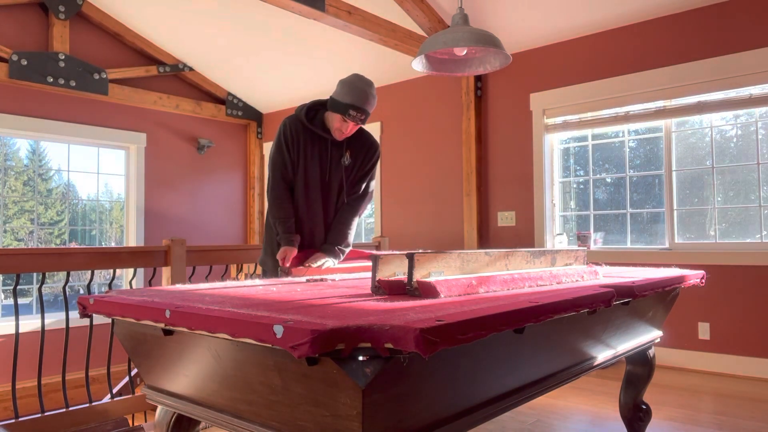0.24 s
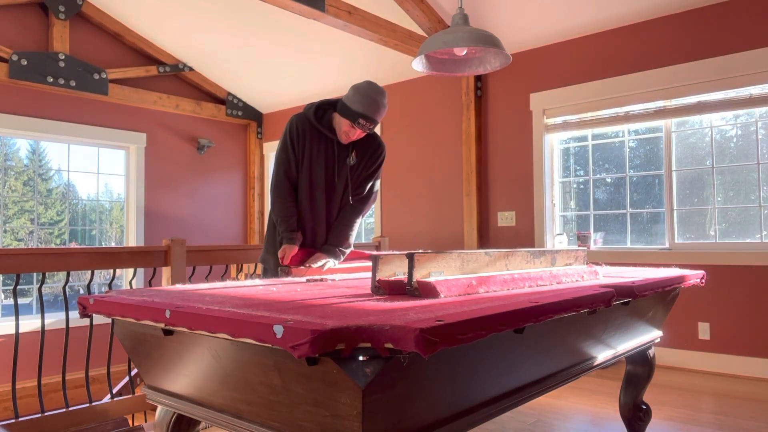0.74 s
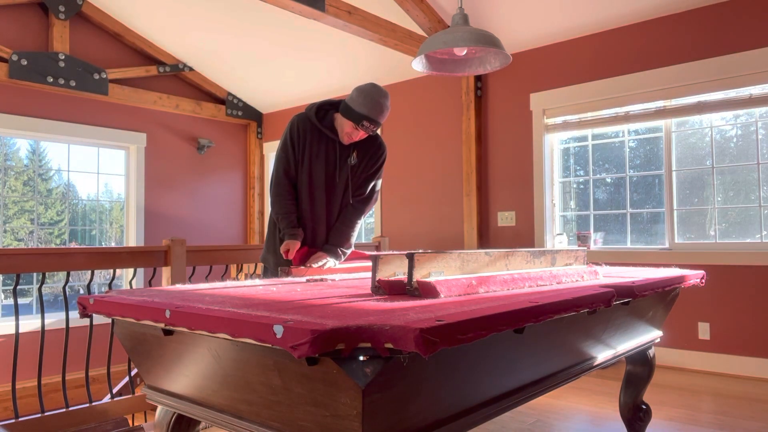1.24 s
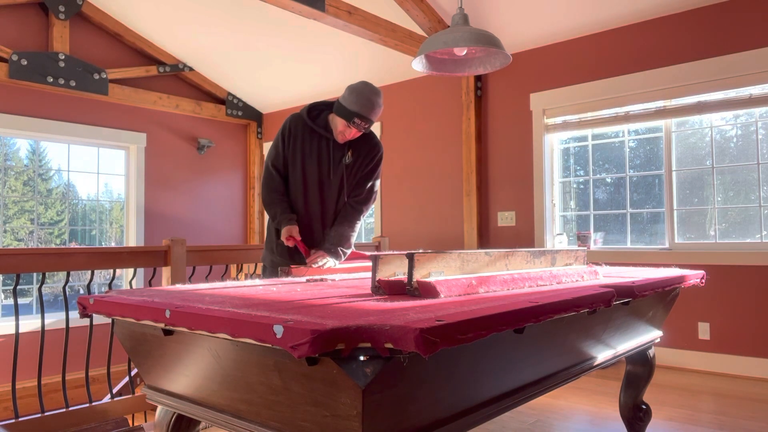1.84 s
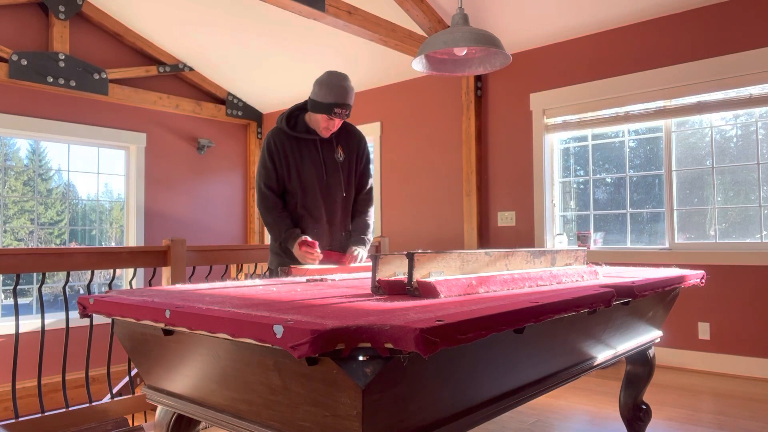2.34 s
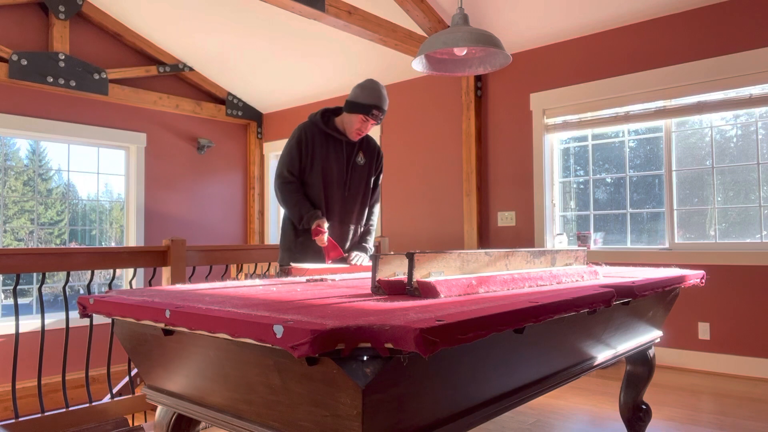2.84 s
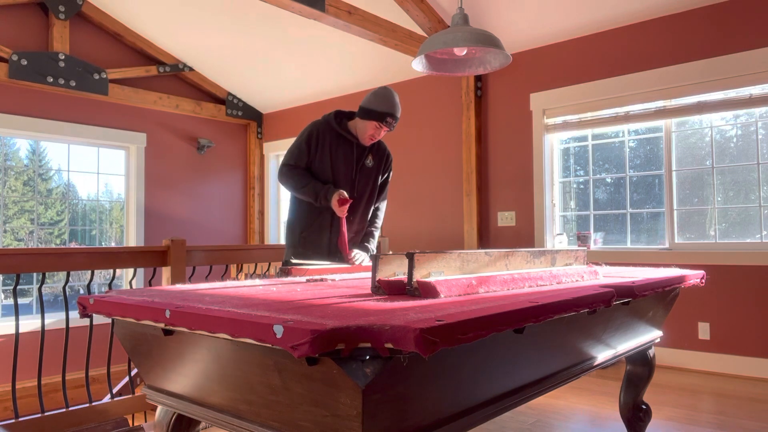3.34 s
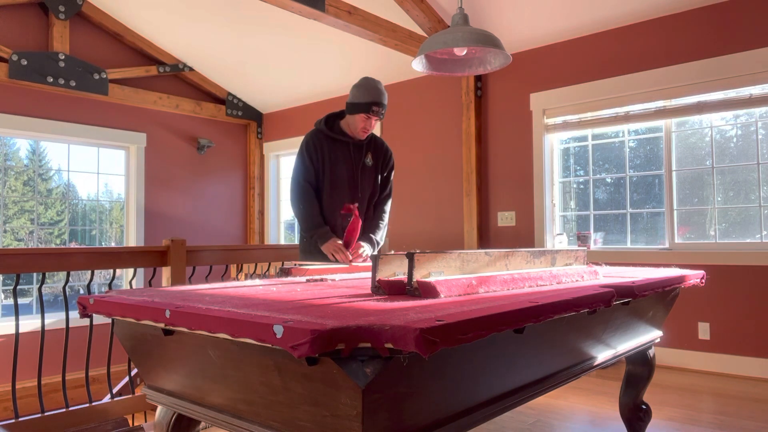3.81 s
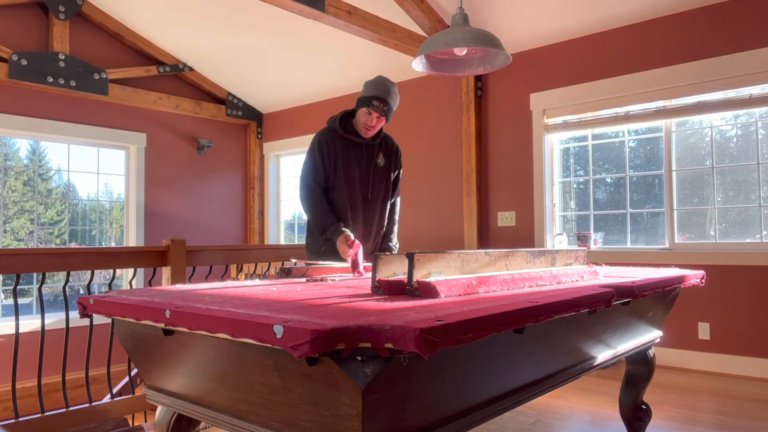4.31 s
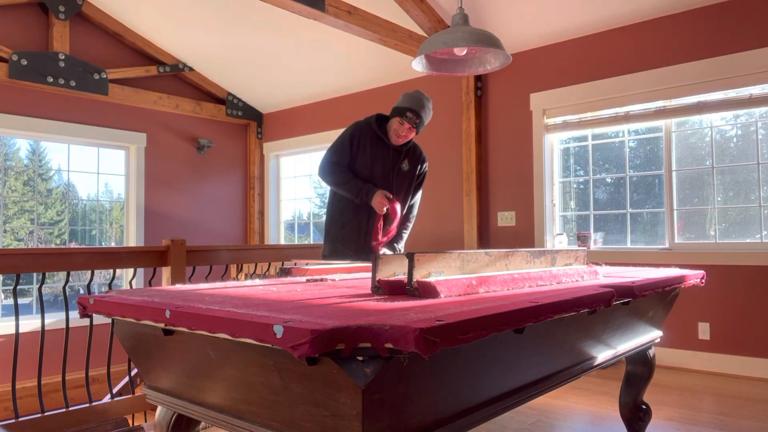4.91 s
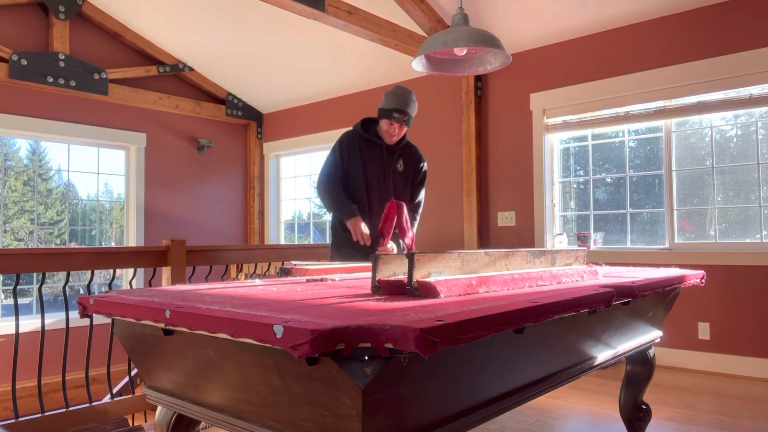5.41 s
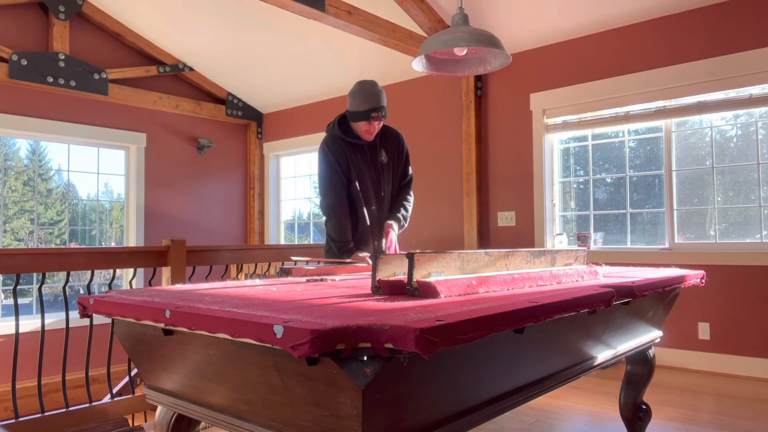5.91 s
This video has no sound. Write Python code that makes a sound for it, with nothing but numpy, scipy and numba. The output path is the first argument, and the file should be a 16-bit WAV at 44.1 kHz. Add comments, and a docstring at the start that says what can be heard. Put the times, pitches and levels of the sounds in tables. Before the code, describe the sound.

In a bare, reverberant wooden room, a few metres from a stereo microphone, hands shuffle and cloth rubs faintly. A wooden rail clatters, then cloth creaks and tears with a crackling rasp that ends in a quick buzz. Loose cloth swishes, a second tear speeds into a buzzing rip, more rustling follows, and a short third tear ends with a heavy wooden knock. A low rumble wavers underneath.

```python
"""Tearing cloth off a pool table rail

A bare, echoing room, heard in stereo a few metres from the microphone, over a low, wavering rumble.
Threads snap in quick runs, ring the taut strip and drum on the wooden rail; two of the three tears
run into fast, buzzing rips, made of pulse trains at the rate of the breaking threads.
Around the tears, filtered grains make loose cloth slide through the hands, scuff and creak;
struck modes make the rail knock on its table."""
import sys
import numpy as np
from scipy import signal
from scipy.fft import rfft, irfft
from scipy.io import wavfile
from numba import njit

SR = 44100
rng = np.random.default_rng(int(sys.argv[2]) if len(sys.argv) > 2 else 0)


def pcm_store(signal):
    """Save signal as 16-bit PCM."""
    levels = np.round(np.clip(np.atleast_2d(signal), -1, 1) * 32767)
    wavfile.write(sys.argv[1], SR, levels.astype(np.int16).T)


N = 271656
T = np.arange(N) / SR


def undb(db):
    """Decibels to gain."""
    return 10 ** (np.asarray(db) / 20)


def unit(x):
    """Scale to rms 1."""
    return x / np.sqrt(np.mean(x ** 2))


def at(hz, points):
    """Read (Hz, value) points on a log-frequency axis."""
    f, value = np.transpose(points)
    return np.interp(np.log(hz + 1), np.log(f), value)


def colour(x, points):
    """Causal filter with the given spectrum shape and unit power gain."""
    size = 4096
    hz = np.arange(size // 2 + 1) * SR / size
    # folding the cepstrum gives minimum phase: no sound before its cause
    cepstrum = irfft(np.log(undb(at(hz, points))))
    cepstrum[1:size // 2] *= 2
    cepstrum[size // 2 + 1:] = 0
    response = irfft(np.exp(rfft(cepstrum)))
    return signal.fftconvolve(x, response / np.linalg.norm(response))[:len(x)]


def walk(rate):
    """Smooth chance with a spread near 1, from `rate` random points a second."""
    return 1.2 * np.interp(T * rate, np.arange(4096), rng.standard_normal(4096))


def snaps(rate, spread_db):
    """Random clicks of unequal size, `rate` a second on average, rms 1."""
    happens = rng.random(N) < rate / SR
    sign = rng.choice([-1, 1], N)
    size = undb(spread_db * rng.standard_normal(N))
    return unit(happens * sign * size)


def pulse_train(hz):
    """One click for each completed cycle of a moving rate."""
    return np.diff(np.floor(np.cumsum(hz) / SR), prepend=0)


def burst(start, length):
    """A sudden start that dies away exponentially, to 1/e after `length` seconds."""
    return (T >= start) * np.exp(-np.clip((T - start) / length, 0, 20))


def gate(start, end, edge):
    """On between two times, with soft edges."""
    return np.clip(np.minimum(T - start, end - T) / edge + .5, 0, 1)


def stroke(start, end):
    """Speed of a hand, 0-1: it gathers pace, then comes to rest."""
    u = np.clip((T - start) / (end - start), 0, 1)
    return 4 * u * (1 - u)


def resonate(x, modes):
    """Pass a sound twice through each resonance for steep skirts, rms 1."""
    out = 0
    for hz, half_width_hz, db in modes:
        b, a = signal.iirpeak(hz, hz / half_width_hz / 2, fs=SR)
        once = signal.lfilter(b, a, x)
        out = out + undb(db) * signal.lfilter(b, a, once)
    return unit(out)


def glide(x, hz, width_hz):
    """Pass a sound through one moving resonance, rms 1."""
    turn = np.exp(2j * np.pi * np.cumsum(hz) / SR)
    # shift the resonance down to 0 Hz, low-pass there, shift back
    narrow = signal.lfilter(*signal.butter(2, width_hz / 2, fs=SR), x / turn)
    return unit((narrow * turn).real)


# difference between the two sides of the field: freq_hz, side_minus_mid_db
FIELD_SIDE = [(50, -19.5), (120, -9.5), (250, -4.5), (600, 2), (15000, -5)]


def widen(mid, side):
    """Left and right of a field: nearly alike in the bass, least near 600 Hz, somewhat more above."""
    gain = undb(at(np.linspace(0, SR / 2, len(side) // 2 + 1), FIELD_SIDE))
    side = irfft(rfft(side) * gain, len(side))
    return np.array([mid + side, mid - side])


# colour of the rumble: freq_hz, relative level_db
RUMBLE_COLOUR = [(14, -53), (29, -32), (41, 8), (50, -6.5), (64, 5.5), (92, -14), (130, -14), (200, -13.5),
                 (290, -18), (520, -33), (790, -36), (1100, -43.5), (2100, -50.5), (5000, -56.5),
                 (11000, -59.5), (15000, -60)]


def ambience(level_db=-50):
    """A low, slowly wavering rumble fills the house: coloured noise on both channels."""
    mid = unit(colour(rng.standard_normal(N), RUMBLE_COLOUR))
    side = unit(colour(rng.standard_normal(N), RUMBLE_COLOUR))
    waver_db = 1.2 * walk(6)
    return widen(mid, side) * undb(level_db + waver_db)


# how long the room rings: freq_hz, t60_s
ROOM_T60 = [(60, 0.65), (200, 0.48), (500, 0.6), (1000, 0.72), (4000, 0.65), (8000, 0.52), (16000, 0.3)]
# strength of the echoes: freq_hz, relative level_db
ROOM_WET = [(100, 1), (300, -6.5), (700, -1.5), (5000, -4), (8000, -1.5), (14000, -2.5)]


def echoes(early_db=3, early_s=0.0054):
    """Bare walls and a wooden floor: strong early echoes, then a tail that dulls."""
    t, hz = T[:SR], np.arange(SR // 2 + 1)
    field = rfft(widen(*rng.standard_normal((2, SR))))
    octave = np.round(np.log2(np.maximum(hz, 2 ** 6)))
    tail = 0
    for b in np.unique(octave):
        in_band = octave == b
        part = irfft(field * in_band) * np.exp(-np.log(1000) * t / at(2 ** b, ROOM_T60))
        # nothing returns in the first 2 ms; the earliest echoes are boosted
        part = part * (t > .002) * (1 + undb(early_db) * np.exp(-t / early_s))
        part = part / np.linalg.norm(part.mean(axis=0))
        tail = tail + part * np.sqrt(np.mean(in_band)) * undb(at(2 ** b, ROOM_WET))
    return tail


def room(x, direct_db=-5, turns_per_s=1.1):
    """Four echo patterns fade round in turn; the direct sound reaches the left microphone first."""
    turn = 2 * np.pi * turns_per_s * T
    wet = 0
    for k in range(4):
        share = np.maximum(np.cos(turn - k * np.pi / 2), 0)
        wet = wet + signal.oaconvolve((x * share)[None], echoes(), axes=1)[:, :N]
    right = np.concatenate([np.zeros(4), x])[:N]  # 4 samples late
    return wet + undb(direct_db) * np.array([x, right])


# light metallic squeaks: start_s, level_db, fade_s (to 1/e)
SQUEAKS = [(2.1, -77.5, 0.18), (2.342, -55.5, 0.039), (2.4, -64.5, 0.079)]
# resonances of the metal: freq_hz, half_width_hz (of each pass), relative level_db
METAL = [(800, 860, -5), (1750, 300, -5.5), (2900, 1600, -9), (4200, 600, -6), (4680, 150, 3),
         (8500, 6000, -19)]


def squeaks():
    """Metal, likely a staple, squeaks thinly: uneven slips excite its resonances."""
    slips = snaps(rate=2000, spread_db=3) * undb(3 * walk(60))
    level = sum(undb(db) * burst(s, fade_s) for s, db, fade_s in SQUEAKS)
    return resonate(slips, METAL) * level


# the cloth starts to drag: start_s, end_s, first_centre_hz, last_centre_hz, level_db
DRAG = (.33, .52, 3600, 3750, -80)


def drag(width_hz=700):
    """The weave zips faintly over the edge of the wood, its narrow band rising a little in pitch."""
    start, end, first_hz, last_hz, db = DRAG
    weave = snaps(rate=1200, spread_db=3) * undb(3 * walk(25))
    centre_hz = np.interp(T, [start, end], [first_hz, last_hz])
    return glide(weave, centre_hz, width_hz) * undb(db) * gate(start, end, edge=0.033)


# coarse fibres scuff the wood: start_s, end_s, peak level_db
SCUFFS = [(0.424, 0.905, -75), (1.042, 1.084, -71), (2.583, 2.668, -53.5), (3.533, 3.685, -54),
          (3.74, 3.823, -58), (4.24, 4.306, -65.5), (5.205, 5.297, -55.5), (5.322, 5.426, -62.5),
          (5.69, 5.86, -65)]
# colour of a scuff: freq_hz, relative level_db (per Hz)
SCUFF_COLOUR = [(300, -4), (900, 8), (1700, 6), (2800, 10.5), (4000, 4.5), (8000, -26), (14000, -53)]


def scuffs():
    """Coarse fibres catch in uneven bunches as the cloth drags."""
    grain = snaps(rate=500, spread_db=4) * undb(3 * walk(55))
    level = sum(undb(db) * np.sqrt(stroke(start, end)) for start, end, db in SCUFFS)
    return unit(colour(grain, SCUFF_COLOUR)) * level


# strokes of loose cloth: start_s, end_s, rub_db, hiss_db (both before the trims below)
SLIDES = [(-.06, 0.023, -62.5, -61), (0.306, 0.944, -72.5, -100), (1.017, 1.073, -74, -73),
          (1.514, 1.66, -62.5, -67), (1.896, 2.274, -71.5, -75), (3.503, 3.864, -56.5, -49.5),
          (3.905, 4.117, -57, -66), (4.288, 4.503, -56.5, -63.5), (5.164, 5.455, -55, -56)]
# hands shift the rail: start_s, end_s, level_db (before the trim below)
SHUFFLES = [(-.05, 0.06, -45), (0.39, 0.954, -52.5), (1.025, 1.15, -43), (1.25, 1.42, -45.5),
            (1.526, 1.64, -41)]
# colours of the rub, the bright hiss and the hands: freq_hz, relative level_db (per Hz)
RUB_COLOUR = [(100, -2.5), (300, 15.5), (500, 7), (1000, 3.5), (1800, 4.5), (2700, 1.5), (4000, 1.5),
              (6500, -8.5), (10000, -44), (15000, 9.5)]
HISS_COLOUR = [(2000, -20), (5000, 2.5), (7500, -1.5), (10000, -1), (12000, -10), (15500, 10.5)]
HANDS_COLOUR = [(70, -7), (140, 1), (260, 14), (500, -3), (900, -4), (1700, -19.5), (4000, -53),
                (10000, -36)]


def handling(rub_db=6.5, hiss_db=7.5, shuffle_db=-10.5, rub_power=0.12, hiss_power=1.85):
    """Loose cloth rubs with a soft grain and hisses at speed; hands shuffle along the rail."""
    # rub and hiss each grow as a power of the hand's speed
    rubbing, hissing = 0, 0
    for start, end, stroke_rub_db, stroke_hiss_db in SLIDES:
        speed = stroke(start, end)
        ease_in = gate(start, np.inf, edge=0.069) ** 2
        rubbing = rubbing + undb(stroke_rub_db) * speed ** rub_power * ease_in
        hissing = hissing + undb(stroke_hiss_db) * speed ** hiss_power
    shifting = sum(undb(db) * np.sqrt(stroke(start, end)) for start, end, db in SHUFFLES)
    catching = undb(2 * walk(45))
    weave = snaps(rate=3000, spread_db=3)
    rub = colour(weave * catching, RUB_COLOUR) * rubbing * undb(rub_db)
    nap = snaps(rate=9000, spread_db=3)
    hiss = colour(nap * catching, HISS_COLOUR) * hissing * undb(hiss_db)
    palms = snaps(rate=2800, spread_db=3)
    shuffle = colour(palms, HANDS_COLOUR) * shifting * undb(shuffle_db)
    return rub + hiss + shuffle


# cloth creaks as it is drawn tight: start_s, length_s (to 1/e), level_db, first_slip_hz, last_slip_hz,
# fall_s (to 1/e), brightness_hz (low-pass)
CREAKS = [(2.464, 0.057, -38, 1110, 397.7, .007, 2800), (4.427, 0.054, -36.5, 473, 307.5, 0.0153, 426)]
# colour of a creak: freq_hz, relative level_db
CREAK_COLOUR = [(120, 6), (300, 4), (480, -2.5), (850, -5), (1300, -16), (1700, -25), (2300, -30),
                (5000, -27)]


def creaks(rough=.09, fibre_db=-9):
    """Cloth sticks and slips on the wood, fast at first and slowing as it tightens."""
    out, wobble = 0, walk(400)
    fibres = colour(snaps(rate=2600, spread_db=4.5), CREAK_COLOUR)
    for s, length, db, first_hz, last_hz, fall_s, bright_hz in CREAKS:
        hz = (last_hz + (first_hz - last_hz) * burst(s, fall_s)) * (1 + rough * wobble)
        slips = pulse_train(hz) - hz / SR  # centred on zero
        voice = unit(colour(slips, CREAK_COLOUR)) + undb(fibre_db) * fibres
        voice = signal.lfilter(*signal.butter(2, bright_hz, fs=SR), voice)
        swell = np.clip((T - s) / .002, 0, 1) * np.exp(-((T - s) / length) ** 2)
        out = out + undb(db) * voice * swell
    return out


# the cloth-covered bed thuds under the heavy blows: start_s, level_db, fade_s (to 1/e)
THUDS = [(1.61, -35, 0.03), (1.634, -36, 0.11), (3.225, -44, 0.07), (6.068, -27, 0.03)]
# colour of a thud: freq_hz, relative level_db (per Hz)
THUD_COLOUR = [(40, -4), (100, 13), (150, 8), (220, 10), (330, -12.5), (600, -6.5), (900, -22.5),
               (1500, -27), (4000, -71)]


def thuds():
    """The cloth-covered bed answers with a broad, dull thud: dark noise that dies away."""
    body = unit(colour(rng.standard_normal(N), THUD_COLOUR))
    return body * sum(undb(db) * burst(s, fade_s) for s, db, fade_s in THUDS)


def ring(modes):
    """One second of the sound of struck modes, neighbours in opposite phase."""
    t, out = T[:SR], 0
    for k, (hz, db, t60) in enumerate(modes):
        decay = np.exp(-np.log(1000) * t / t60)
        out = out + (-1) ** k * undb(db) * np.sin(2 * np.pi * hz * t) * decay
    return out


def add(out, start, sound):
    """Mix a sound in at a time."""
    i = int(start * SR)
    out[i:i + len(sound)] += sound[:N - i]


# rail knocks: start_s, ring_db, lowest_hz (high-pass), brightness_hz (low-pass), crack_db, boom_db
# (ring and crack before the trims below)
KNOCKS = [(1.6, -18, 302, 2020, -9.5, -73), (1.606, -8, 770, 3000, -6.5, -50),
          (1.613, -16.5, 109, 2000, -13, -46), (1.628, -12.5, 607, 1200, -10, -37),
          (1.64, -22.5, 80.6, 1200, -15, -40), (1.668, -31, 90.5, 1800, -18.5, -37),
          (1.651, -31.5, 78.6, 1500, -19, -44), (3.226, -22.5, 78, 100, -55, -66),
          (3.312, -23, 70, 91, -56.5, -61), (4.941, -16.5, 59, 95, -46, -59),
          (6.055, -23, 296, 3000, -6.5, -86), (6.067, 2, 206, 340, -9, -33.5),
          (6.081, 0.5, 225, 430, -10.5, -49), (6.099, -11, 141, 447, -3, -43),
          (6.124, -11, 140, 500, -12, -58), (6.143, -14, 140, 400, -12, -46)]
# modes of the rail on its table, then of the heavy table: freq_hz, relative level_db, t60_s
RAIL_MODES = [(122, -1, 0.55), (155, -1.5, 0.14), (186, -1, 0.28), (231, 1, 0.16), (254, -1, 0.09),
              (340, -1.5, 0.1), (445, -3, 0.03), (556, -9, 0.054), (600, -7, 0.08), (788, -13, 0.17),
              (834, -18, 0.14), (1325, -13.5, 0.09), (1510, -13.5, 0.07), (2520, -19, 0.045),
              (2810, -18, 0.03)]
TABLE_MODES = [(42.2, 6.5, 0.56), (58, -19, 0.13), (64.35, 0, 0.46), (128, -18.5, 0.93)]
# colour of the contact: freq_hz, relative level_db
CRACK_COLOUR = [(100, -14), (350, -25), (700, 4), (1400, 4), (2000, -1), (2800, 1), (4500, -1), (7000, -7),
                (10000, -13), (12500, -23.5), (15500, 2.5)]


def knocks(ring_trim_db=-11, crack_trim_db=-14.5):
    """The rail lands and rattles: wood rings, the contact cracks, the heavy table booms."""
    out, wood, table = np.zeros(N), ring(RAIL_MODES) * undb(ring_trim_db), ring(TABLE_MODES)
    crack = colour(rng.standard_normal(N), CRACK_COLOUR)
    for s, ring_db, low_hz, bright_hz, crack_db, boom_db in KNOCKS:
        # a softer contact leaves the high modes still, one near the end the low modes
        struck = signal.lfilter(*signal.butter(1, bright_hz, fs=SR), wood)
        struck = signal.lfilter(*signal.butter(2, low_hz, "high", fs=SR), struck)
        add(out, s, undb(ring_db) * struck + undb(boom_db) * table)
        out += undb(crack_db + crack_trim_db) * crack * burst(s, length=0.0035)
    return out


# bunches of strong threads give way: start_s, level_db, fade_s (to 1/e)
BUNCHES = [(2.74, -51, .018), (3.06, -49, .018), (3.135, -49, .02), (4.717, -46.5, .014),
           (4.744, -41.5, .02), (4.78, -48, .016), (4.808, -43, .018), (4.868, -46, .02), (5.685, -56, .03),
           (5.775, -50, .025)]
# resonances of the burst: freq_hz, half_width_hz (of each pass), relative level_db
BUNCH_MODES = [(3650, 260, 4), (4670, 600, 0), (5900, 970, -15)]


def bunches():
    """Now and then strong threads break in a cluster: a coarse burst through high resonances."""
    grain = snaps(rate=900, spread_db=4)
    level = sum(undb(db) * burst(s, fade_s) for s, db, fade_s in BUNCHES)
    return resonate(grain, BUNCH_MODES) * level


# fast rips: start_s, end_s, first_thread_hz, last_thread_hz, buzz_db, rasp_db, unevenness (0-1)
RIPS = [(3.15, 3.205, 385, 330, -31, -42, .06), (4.47, 4.56, 260, 245, -43.5, -60, .12),
        (4.65, 4.72, 250, 250, -45, -60, .12), (4.72, 4.78, 290, 260, -39, -58, .12),
        (4.77, 4.87, 255, 245, -32, -50, .06), (4.808, 4.88, 310, 325, -44, -38.5, .2),
        (4.88, 4.935, 335, 350, -33, -41, .06)]
# colours of the rasp and the buzz: freq_hz, relative level_db
RASP_COLOUR = [(120, -5), (300, 2), (600, 2), (950, -3.5), (1500, -14), (2200, -17), (4000, -42),
               (9000, -24.5)]
BUZZ_COLOUR = [(100, -13), (230, 9.5), (380, 0.5), (600, -36.5), (1200, -25.5), (3000, -33.5)]


def rips():
    """At speed the tear crosses the weave thread by thread, fast enough to have a pitch."""
    out, wobble = 0, walk(150)
    rasp = colour(snaps(rate=700, spread_db=3), RASP_COLOUR)
    for start, end, first_hz, last_hz, buzz_db, rasp_db, uneven in RIPS:
        hz = np.interp(T, [start, end], [first_hz, last_hz]) * (1 + uneven * wobble)
        pulses = pulse_train(hz)
        buzz = unit(colour(pulses - pulses.mean(), BUZZ_COLOUR))
        rip = undb(buzz_db) * buzz + undb(rasp_db) * rasp
        out = out + gate(start, end, edge=.016) * rip
    return out


# tears: start_s, end_s, pull_db (steady, before the thread trim), gives_s (the cloth gives), surge_db,
# surge_half_width_s (to 1/e), drum_db (rail drumming relative to the pull)
TEARS = [(2.506, 3.203, -57, 3.18, 11, 0.056, 9.5), (4.373, 4.895, -60, 4.86, 14, 0.18, 10.5),
         (5.64, 6.097, -58, 5.8, 6.5, 0.064, 6.5)]


def pulls(attack_s=0.11, release_s=0.02, drum_lag_s=0.042, drum_surge_share=0.56):
    """A pull builds slowly, surges as the cloth gives, lets go fast; the rail lags and surges less."""
    threads, rail = 0, 0
    for start, end, db, gives, surge_db, width, drum_db in TEARS:
        surge = surge_db * np.exp(-((T - gives) / width) ** 2)
        grip = gate(start, np.inf, edge=attack_s) ** 2
        held = grip * gate(-np.inf, end, edge=release_s) * undb(db)
        threads = threads + held * undb(surge)
        rail = rail + held * undb(drum_db + drum_surge_share * surge)
    return threads, np.interp(T - drum_lag_s, T, rail)


@njit
def taut_strip(x, lag, reflect):
    """Each snap runs up the strip to the hand and back, again and again."""
    y = x.copy()
    for i in range(200, len(x)):
        k = int(lag[i])
        part = lag[i] - k
        y[i] += reflect[i] * ((1 - part) * y[i - k] + part * y[i - k - 1])
    return y


# stretches in which one overtone of the strip whistles: start_s, end_s, overtone_number, level_db
WHISTLES = [(2.7, 2.82, 3, -60), (2.92, 3.1, 3, -59), (4.4, 4.72, 4, -64.5), (4.33, 4.62, 3, -71)]


def whistle(threads, strip_hz):
    """Snaps feed one narrow overtone in fits; it glides with the pitch of the strip."""
    fitful = threads * undb(3 * walk(35))
    out = 0
    for start, end, overtone, db in WHISTLES:
        tone = glide(fitful, overtone * strip_hz, width_hz=300)
        out = out + tone * undb(db) * gate(start, end, edge=.04)
    return out


# the hand reflects a share of each snap, so the freed strip rings while taut:
# time_s, pitch_hz (before a slight waver), reflected_share
STRIP = [(2.55, 1750, .15), (2.7, 1550, .3), (2.83, 1350, .15), (2.92, 1880, .35), (3.0, 1720, .35),
         (3.08, 1460, .35), (3.14, 1350, .1), (4.3, 1320, .1), (4.38, 1270, .4), (4.52, 1190, .35),
         (4.66, 1070, .3), (4.76, 920, .3), (4.84, 850, .1), (5.68, 1180, .25), (6.05, 900, .1)]
# colours of the threads and of the drumming rail: freq_hz, relative level_db (per Hz)
THREAD_COLOUR = [(200, -25), (600, 13), (1000, 14.5), (1600, 7), (2300, 1), (3300, 7.5), (4300, 9.5),
                 (5800, 7), (7500, 0), (10000, -2), (11800, -8), (15500, -8)]
DRUM_COLOUR = [(50, -15), (75, 11.5), (95, 1), (130, 11.5), (190, 3), (250, 1.5), (400, -3), (700, -5),
               (1500, -18.5), (4000, -79)]


def tearing(ring_low_hz=3300, ring_high_hz=6300, thread_db=4):
    """Threads snap in uneven bunches; the strip rings with them and the rail drums."""
    thread_gain, rail_gain = pulls()
    threads = snaps(rate=1000, spread_db=3.5) * undb(4 * np.tanh(walk(90)))
    times, strip_hz, share = np.transpose(STRIP)
    # the pull is never quite even
    hz = np.interp(T, times, strip_hz) * (1 + .014 * walk(40))
    rung = taut_strip(threads, SR / hz, np.interp(T, times, share))
    # only the middle overtones of the strip carry into the air
    band = signal.butter(2, [ring_low_hz, ring_high_hz], "band", fs=SR)
    overtones = signal.filtfilt(*band, rung - threads)
    crackle = unit(colour(threads + overtones, THREAD_COLOUR)) * thread_gain * undb(thread_db)
    drumming = unit(colour(threads, DRUM_COLOUR)) * rail_gain
    return crackle + whistle(threads, hz) + drumming


def scene():
    """All the work at the table sounds through the room, over the rumble."""
    cloth = drag() + scuffs() + handling() + creaks()
    wood_and_metal = squeaks() + thuds() + knocks()
    tears = bunches() + rips() + tearing()
    return ambience() + room(cloth + wood_and_metal + tears)


def record(dry, top_hz=12400):
    """The recorder cuts the top with a steep low-pass."""
    return signal.sosfilt(signal.ellip(8, .2, 70, top_hz, fs=SR, output="sos"), dry)


dry = scene()
out = record(dry)
pcm_store(out)
```